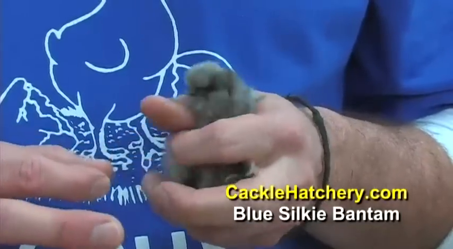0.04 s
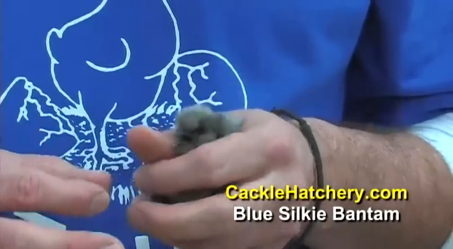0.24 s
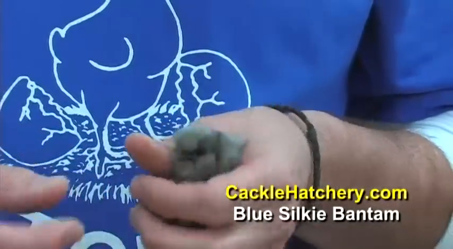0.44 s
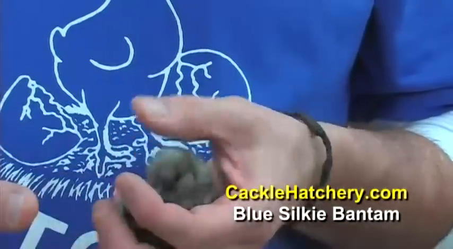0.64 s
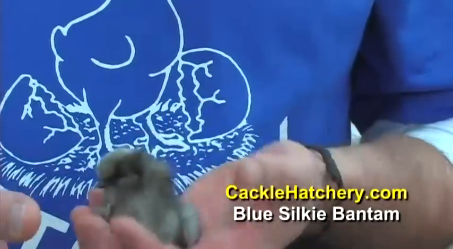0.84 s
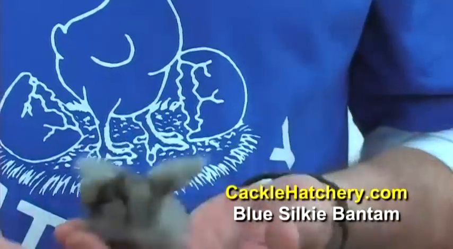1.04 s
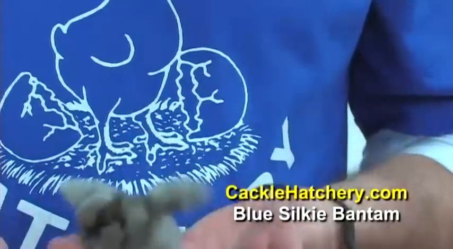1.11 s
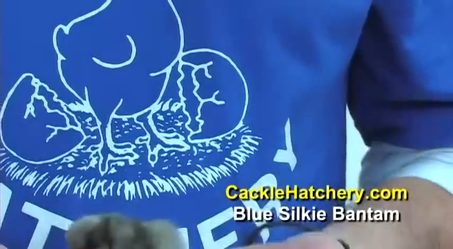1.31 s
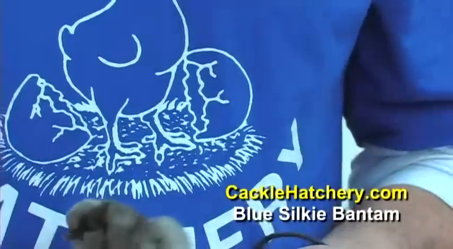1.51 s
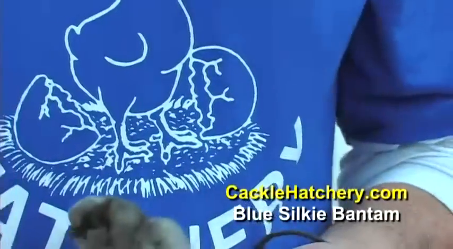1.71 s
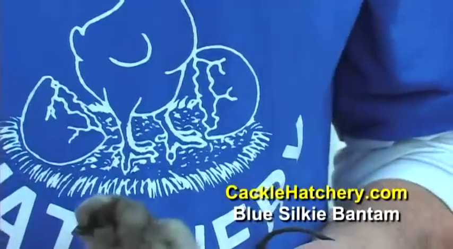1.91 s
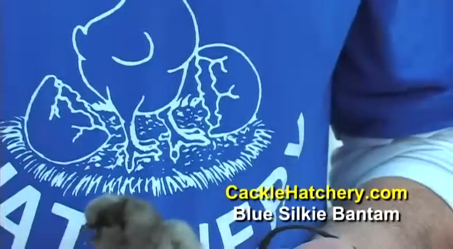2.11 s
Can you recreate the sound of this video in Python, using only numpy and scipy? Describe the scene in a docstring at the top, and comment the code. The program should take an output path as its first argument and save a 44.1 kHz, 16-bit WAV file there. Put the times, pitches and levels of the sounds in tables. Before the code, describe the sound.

A chick peeps close to the microphone at about 0.2, 0.7, 1.1, 1.5 and 1.8 seconds, each short, high call starting raspy and sweeping down. A sixth just begins at 2.1 seconds. Hands brush and bump softly near the start. Tiny claw ticks come at 1.2 seconds, then a light hollow knock and rustle at 1.3. Throughout, other chicks call faintly across the room over a steady, humming fan.

```python
"""From the start, other chicks call across a room over the broadband noise and hum of a ventilation fan.
At 0.2 s a chick held close to the microphone gives the first of five peeps, as hands brush and bump.
Each opens with a thin whistle, breaks into a rasp of pulses ringing the throat, then arches and sweeps
down, mostly with its octave taking over. After the third come tiny claw ticks and, at 1.3 s, a light
hollow knock as the chick is set down. Two more peeps follow, and a sixth is just starting at the end."""
import sys
import numpy as np
from scipy import signal
from scipy.fft import rfft, irfft
from scipy.io import wavfile
from scipy.ndimage import uniform_filter1d

SR = 44100
rng = np.random.default_rng(int(sys.argv[2]) if len(sys.argv) > 2 else 0)


def generate_wav(signal):
    """Clip the signal to [-1, 1] and save it as 16-bit WAV at the path in sys.argv[1]."""
    frames = np.transpose(np.atleast_2d(signal))
    scaled = np.clip(frames, -1, 1) * 32767
    pcm = np.round(scaled).astype(np.int16)
    wavfile.write(sys.argv[1], SR, pcm)


N = 94815
T = np.arange(N) / SR


# Contours of the five peeps, levels relative to PEEP_DB: time_s, pitch_hz, first_db, octave_db, third_db
FIRST_PEEP = [(0.238, 3530, -36.5, -46, -43), (0.2555, 3873, -31.5, -37, -94),
              (0.2605, 4003, -31, -38, -72), (0.2824, 4067, -28, -37.5, -64), (0.3039, 3885, -25, -32, -43),
              (0.3063, 3575, -23, -43, -33.5), (0.3133, 3483, -22.5, -23.5, -39),
              (0.3238, 3177, -27.5, -20, -55), (0.3273, 3077, -27.5, -16.5, -42),
              (0.3388, 2823, -32.5, -12.5, -37.5), (0.3473, 2550, -44, -17, -47),
              (0.3567, 2082, -50, -34.5, -36)]
SECOND_PEEP = [(0.677, 4149, -38.5, -54, -82), (0.701, 4139, -37, -60, -64), (0.714, 4064, -34.5, -58, -58),
               (0.7305, 3887, -32, -44, -66), (0.7405, 3430, -28, -36.5, -44.5),
               (0.7442, 3310, -25.5, -44, -58), (0.7459, 3670, -31, -51, -68),
               (0.7486, 3620, -35, -44, -56), (0.7555, 3200, -36, -48, -63), (0.7615, 3104, -36, -45, -76),
               (0.7825, 2136, -50, -57, -58)]
THIRD_PEEP = [(1.116, 3687, -38, -65, -77), (1.123, 3740, -39, -47, -64), (1.1315, 3836, -35.5, -53, -54),
              (1.1559, 3820, -30, -45.5, -46.5), (1.1631, 3384, -31.5, -27, -46.5),
              (1.1774, 3115, -33.5, -26, -61), (1.1802, 2950, -34.5, -22, -59),
              (1.1903, 2674, -42, -37, -51), (1.1928, 2800, -38.5, -33, -58),
              (1.2055, 2214, -48, -37.5, -45), (1.212, 2010, -67, -44, -48)]
FOURTH_PEEP = [(1.466, 3984, -45.5, -53, -76), (1.5022, 3900, -39.5, -51.5, -56),
               (1.5115, 3713, -36.5, -37, -52), (1.5214, 3406, -42, -29, -54),
               (1.5289, 3240, -59, -21, -67), (1.5367, 2967, -53, -19, -68),
               (1.5415, 2825, -40.5, -23.5, -69), (1.5505, 2783, -50, -31, -66),
               (1.5522, 2656, -60, -30.5, -47), (1.5568, 2494, -61, -31, -45), (1.568, 2010, -62, -38, -46)]
FIFTH_PEEP = [(1.815, 3936, -52, -73, -64), (1.835, 3940, -39, -55.5, -51), (1.8591, 3525, -37.5, -28, -44),
              (1.8655, 3386, -35.5, -27.5, -51), (1.8746, 3080, -42, -15.5, -60),
              (1.8829, 2905, -54, -18, -53), (1.8904, 2790, -48, -24, -64), (1.8933, 2690, -62, -44, -60),
              (1.8976, 2560, -51, -32, -52), (1.9043, 2229, -49, -29.5, -44), (1.9108, 2015, -73, -42, -41)]
PEEP_DB, SHIMMER_DB, JITTER, FLUTTER_HZ = 1.6, 1, 0.0048, 250
EDGE_S, GLIDE_S = 0.009, 0.003   # the throat cannot change faster than the glide time

def peep(contour):
    """Harmonic vibration of the voice box; its other side modulates the octave, adding faint sidebands."""
    times, *columns = np.transpose(contour)
    curves = [uniform_filter1d(np.interp(T, times, column), int(GLIDE_S * SR)) for column in columns]
    pitch_hz, first_db, octave_db, third_db = curves
    gate = np.clip(np.minimum(T - times[0], times[-1] - T) / EDGE_S + .5, 0, 1)
    phase = phase_of(pitch_hz * (1 + JITTER * drift(FLUTTER_HZ)))
    levels_db = [first_db, octave_db, third_db, third_db - 15.5]
    partials = [from_db(db) * np.sin(k * phase) for k, db in enumerate(levels_db, 1)]
    second_voice = np.sin(phase_of(hz=3820 * (1 + 0.0205 * drift(FLUTTER_HZ))))
    sidebands = partials[1] * from_db(-29) * second_voice
    hoarseness = from_db(-55) * drift(264) * np.sin(phase)   # breaks up the tone where it is weak
    husk = 1 + from_db(-28) * drift(1040)
    gain = from_db(PEEP_DB + SHIMMER_DB * drift(FLUTTER_HZ))
    voice = (sum(partials) + sidebands + hoarseness) * husk * gain
    beak_air = from_db(octave_db - 39) * unit_rms(butter(rng.standard_normal(N), [8000, 14000], "band"))
    return gate * (butter(voice, 11340, "low", order=4) + beak_air)


# Raspy openings of the peeps: start_s, length_s, whistle_db, whistle_fraction, rattle_db,
# first_rate_hz, last_rate_hz, rate_jitter_fraction, upper_resonance_db
RASP_ONSETS = [(.222, .044, -28, 0.45, -20.5, 1320, 286, 0.1, -5),
               (0.648, 0.046, -34, 0.76, -25, 550, 800, .15, -25),
               (1.089, .044, -39.5, 1, -32.5, 900, 880, 0.04, -16),
               (1.446, .025, -46, .95, -25.5, 780, 520, .12, -23),
               (1.782, .032, -42, 0.28, -22, 930, 960, 0.01, -26),
               (2.138, 0.027, -32, 0.51, -30, 1440, 900, .1, -24)]
WHISTLE_HZ, WHISTLE_RISE_HZ_PER_S, RELEASE_S = 4630, 57000, 0.0045

def rasp(start, length, whistle_db, fraction, rattle_db, first_hz, last_hz, jitter, upper_db):
    """Source and filter: a rising whistle gives way to uneven, growing pulses that ring the throat."""
    progress = np.clip((T - start) / length, 0, 1)
    arch = np.sin(np.pi * np.minimum(progress / fraction, 1))
    whistle_hz = WHISTLE_HZ + WHISTLE_RISE_HZ_PER_S * progress * length
    whistle = from_db(whistle_db) * arch * np.sin(phase_of(whistle_hz))
    rate_hz = (first_hz + (last_hz - first_hz) * progress) * (1 + jitter * drift(FLUTTER_HZ))
    cycles = np.cumsum(rate_hz * (progress > 0)) / SR
    swell = progress ** 0.86 * np.minimum((1 - progress) * length / RELEASE_S, 1)
    pulses = np.diff(np.floor(cycles), prepend=0) * swell
    pulses *= from_db(rattle_db + 1.5 * rng.standard_normal(N))
    throat = butter(resonate(pulses, hz=5225, t60_s=0.0024), 7500, "low", order=4)
    upper = from_db(upper_db) * resonate(pulses, hz=8240, t60_s=0.002)
    return whistle + butter(throat + upper, 9000, "low", order=6)


def resonate(pulses, hz, t60_s):
    """Two damped resonators in cascade, each with decay time t60_s; a unit pulse rings to height 1."""
    radius, angle = from_db(-60 / (t60_s * SR)), 2 * np.pi * hz / SR
    sos = [[1, 0.032, -0.96, 1, -2 * radius * np.cos(angle), radius * radius]] * 2
    peak = np.abs(signal.sosfilt(sos, signal.unit_impulse(256))).max()
    return signal.sosfilt(sos, pulses + 1e-18) / peak


# Calls of other chicks: start_s, length_s, top_hz, end_hz, crest_fraction, first_db, octave_db
NEIGHBOUR_CALLS = [(.0, 0.065, 3450, 2690, 0.042, -51, -60), (.02, .11, 4940, 3600, 0.22, -46.5, -81),
                   (.08, 0.069, 3714, 2540, 0.046, -49, -62), (.13, .055, 3500, 2820, 0.061, -49.5, -68),
                   (.19, 0.058, 3690, 3310, 0.058, -43.5, -50), (.365, 0.15, 4800, 4120, .1, -42, -68),
                   (.425, 0.069, 3620, 2580, 0.046, -54, -57), (.46, 0.055, 5240, 4420, 0.12, -50, -69),
                   (.47, 0.075, 4050, 3110, 0.063, -44.5, -68),
                   (.555, 0.054, 3130, 2630, 0.056, -50.5, -72),
                   (.62, 0.044, 2650, 2070, 0.054, -55.5, -66), (.665, 0.045, 3600, 2680, .1, -60, -45),
                   (.675, 0.095, 4880, 3950, 0.23, -44, -75), (.815, .15, 4820, 3495, 0.265, -42, -72),
                   (.865, 0.057, 2860, 2330, 0.036, -50.5, -64), (.91, 0.076, 3530, 2610, 0.025, -60, -56),
                   (1.018, 0.058, 3764, 2620, 0.022, -49, -39.5),
                   (1.04, 0.035, 2305, 2100, 0.23, -49.5, -70), (1.075, .07, 4860, 4130, 0.13, -43.5, -60),
                   (1.23, 0.048, 3470, 2840, 0.062, -76, -68), (1.35, 0.13, 4900, 4080, 0.18, -38.5, -72),
                   (1.395, 0.044, 2370, 2100, 0.072, -49, -66), (1.555, 0.028, 2850, 2490, 0.06, -46, -68),
                   (1.585, .11, 4400, 4120, 0.42, -56.5, -80), (1.685, .1, 4680, 4100, 0.17, -45, -67),
                   (1.84, .1, 4920, 4350, 0.48, -43.5, -73), (1.905, 0.047, 2420, 2060, 0.12, -51, -71),
                   (1.955, 0.082, 3670, 2530, 0.032, -61, -42.5), (2.0, 0.053, 4350, 4250, .4, -54, -83),
                   (2.085, 0.16, 4520, 4300, 0.51, -47.5, -75)]
ECHO_S, ECHO_DB = 0.014, -16.5

def neighbours():
    """Interference: a delayed reflection off the table beats against the gliding calls."""
    direct = far_peeps(NEIGHBOUR_CALLS)
    return direct + from_db(ECHO_DB) * np.interp(T - ECHO_S, T, direct)


def far_peeps(calls):
    """Frequency and amplitude modulation: arched calls swell and fade, wavering as they cross the room."""
    out = np.zeros(N)
    for start, length, top_hz, end_hz, crest, first_db, octave_db in calls:
        span = (T > start) & (T < start + length)
        progress = (T[span] - start) / length
        phase = phase_of(top_hz + (end_hz - top_hz) * ((progress - crest) / (1 - crest)) ** 2)
        out[span] += from_db(first_db) * np.sin(np.pi * progress) ** 0.67 * np.sin(phase)
        late_swell = np.sin(np.pi * progress ** 2.23)
        out[span] += from_db(octave_db) * late_swell * np.sin(2 * phase)
    return out * from_db(3 * drift(120))


def flock(calls_per_s=30):
    """Incoherent superposition: many faint calls overlap at random times and pitches."""
    calls = []
    for when, long, high, loud in rng.random((int(calls_per_s * N / SR), 4)):
        start_s, length_s = when * N / SR - .04, .06 + .048 * long
        top_hz, level_db = 3200 + 1600 * high, -59 + 6 * loud
        calls.append((start_s, length_s, top_hz, .72 * top_hz, .15, level_db, level_db - 4 - 14 * high))
    return far_peeps(calls)


# Touches of the hands: peak_s, rise_s, decay_s, thud_db, rustle_db
TOUCHES = [(0.142, 0.0041, 0.027, -45.5, -62), (0.263, 0.021, 0.028, -44, -51.5),
           (1.314, 0.0023, 0.022, -48, -48.5), (1.37, 0.033, 0.077, -53, -56)]
# Spectra of a soft bump and of rubbing skin and cloth: frequency_hz, relative_density_db
THUD_SPECTRUM = [(100, -13), (250, -2.5), (460, -1), (700, -10), (1200, -16), (3000, -46)]
RUSTLE_SPECTRUM = [(600, -28), (1200, -4), (1700, 4.5), (2500, 8.5), (4000, -9), (9000, -5.5), (15000, -50)]

def hands():
    """Impact and friction: each touch is a swell of dull noise with a grainy rustle."""
    thud = noise(THUD_SPECTRUM)
    rustle = noise(RUSTLE_SPECTRUM) * from_db(2.1 * drift(200))
    out = np.zeros(N)
    for peak_s, rise_s, decay_s, thud_db, rustle_db in TOUCHES:
        envelope = np.exp(-np.maximum((peak_s - T) / rise_s, (T - peak_s) / decay_s))
        out += envelope * (from_db(thud_db) * thud + from_db(rustle_db) * rustle)
    return out


# Claw contacts: start_s, gain_db
CLAW_TICKS = [(1.223, -46), (1.228, -38), (1.954, -43)]

def claws(decay_s=0.0008):
    """Brief contacts have wide spectra: each tick is a fast-decaying burst of treble noise."""
    envelope = sum(from_db(db) * (T >= s) * np.exp(-np.abs(T - s) / decay_s) for s, db in CLAW_TICKS)
    return envelope * butter(rng.standard_normal(N), [5000, 10500], "band")


# Modes of the hollow knock: frequency_hz, level_db, t60_s
HOLLOW_MODES = [(463, -38.5, 0.073), (1660, -50, .05), (2080, -45, 0.086), (2620, -50, .05)]

def knock(start_s=1.308):
    """Free vibration: setting the chick down excites a few modes that decay exponentially."""
    age = np.maximum(T - start_s, 0)
    return sum(from_db(db - 60 * age / t60) * np.sin(2 * np.pi * hz * age) for hz, db, t60 in HOLLOW_MODES)


# Fan and mains tones: frequency_hz, rms_db
HUM_TONES = [(119, -62), (173, -69), (787, -63.5), (1173, -74)]
# Spectrum of the room air and fan: frequency_hz, relative_density_db
AIR_SPECTRUM = [(25, -17), (48, -30), (75, -8.5), (120, 1.5), (220, -0.5), (330, -5), (600, -9),
                (820, -9.5), (1000, -16.5), (1500, -22.5), (2300, -21), (3300, -13.5), (4500, -9.5),
                (6300, -20.5), (8500, -27), (12000, -30.5), (15000, -35.5)]
AIR_DB, AIR_FLICKER_DB, HUM_WAVER_HZ = -49.5, 0.6, 2.36

def fan():
    """A line spectrum over a continuous one: wavering tones and the noise of rushing air."""
    hum = sum(from_db(db) * np.sqrt(2) * np.sin(phase_of(hz + HUM_WAVER_HZ * drift(8.45)))
              for hz, db in HUM_TONES)
    return hum + from_db(AIR_DB + AIR_FLICKER_DB * drift(8.8)) * noise(AIR_SPECTRUM)


def room(sound, t60_s=0.26, wall_cutoff_hz=8900):
    """Diffuse reverberation: convolution with a slightly dull, decaying noise tail of unit energy."""
    age = T[:SR // 2]
    tail = butter(rng.standard_normal(len(age)), wall_cutoff_hz, "low")
    tail *= from_db(-60 * age / t60_s) * (age > .004)
    return signal.fftconvolve(sound, tail / np.linalg.norm(tail))[:N]


def stereo_placement(early, lag_s=2.1e-5, band_hz=(2550, 12800)):
    """Time difference: the right channel lags slightly in the treble, setting the sound a little left."""
    late = irfft(rfft(early) * np.exp(-2j * np.pi * np.fft.rfftfreq(N, 1 / SR) * lag_s), N)
    side = signal.sosfiltfilt(signal.butter(3, band_hz, "band", fs=SR, output="sos"), (early - late) / 2)
    return (early + late) / 2 + side * np.array([[1], [-1]])


def from_db(db):
    """Amplitude ratio of a level in decibels."""
    return 10 ** (np.asarray(db) / 20)


def unit_rms(x):
    """Normalisation to unit mean power."""
    return x / np.sqrt(np.mean(x ** 2) + 1e-20)


def butter(x, hz, kind, order=2):
    """Filter with a maximally flat passband."""
    return signal.sosfilt(signal.butter(order, hz, kind, fs=SR, output="sos"), x)


def drift(bandwidth_hz):
    """Low-pass random fluctuation of rms 1."""
    return unit_rms(butter(rng.standard_normal(N + SR), bandwidth_hz, "low")[SR:])


def phase_of(hz):
    """Phase as the running integral of frequency."""
    return 2 * np.pi * np.cumsum(hz) / SR


def noise(spectrum):
    """Spectral shaping: steady coloured noise of rms 1."""
    hz, db = np.transpose(spectrum)
    bins_hz = np.maximum(np.fft.rfftfreq(N, 1 / SR), 1)
    gain = from_db(np.interp(np.log(bins_hz), np.log(hz), db))
    return unit_rms(irfft(rfft(rng.standard_normal(N)) * gain, N))


def scene():
    """Superposition of direct sound and reverberation; the far chicks are the more reverberant."""
    chick = sum(map(peep, (FIRST_PEEP, SECOND_PEEP, THIRD_PEEP, FOURTH_PEEP, FIFTH_PEEP)))
    chick += sum(rasp(*onset) for onset in RASP_ONSETS)
    others, crowd = neighbours(), flock()
    direct = chick + others + crowd + hands() + claws() + knock() + fan()
    reverberation = room(from_db(-27) * chick + from_db(-17.5) * others + from_db(-12) * crowd)
    return stereo_placement(direct + reverberation)


def record(dry):
    """Band limiting: a steep elliptic low-pass removes the treble above 15.3 kHz."""
    return signal.sosfilt(signal.ellip(10, .1, 80, 15300, fs=SR, output="sos"), dry)


dry = scene()
out = record(dry)
generate_wav(out)
```